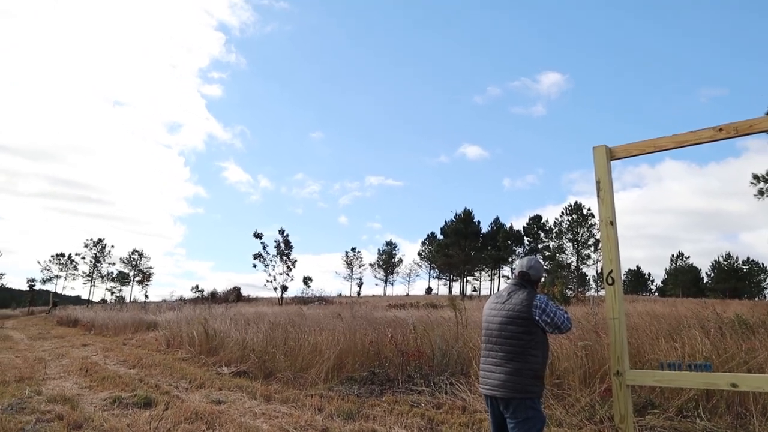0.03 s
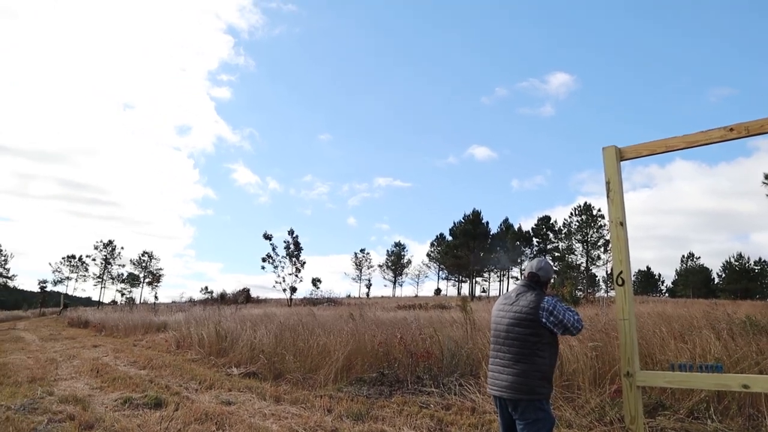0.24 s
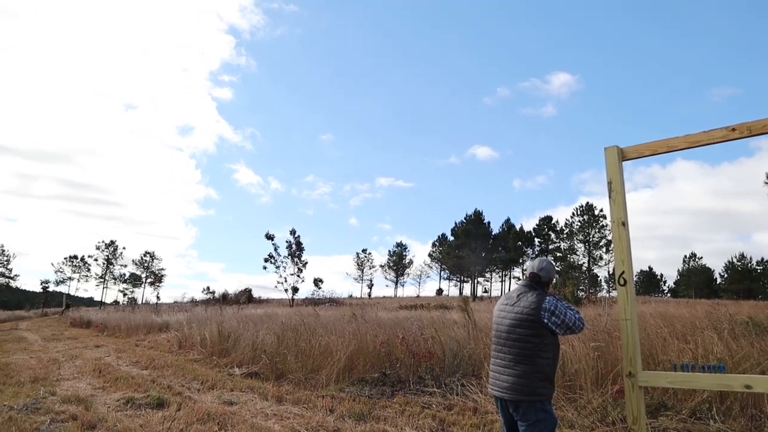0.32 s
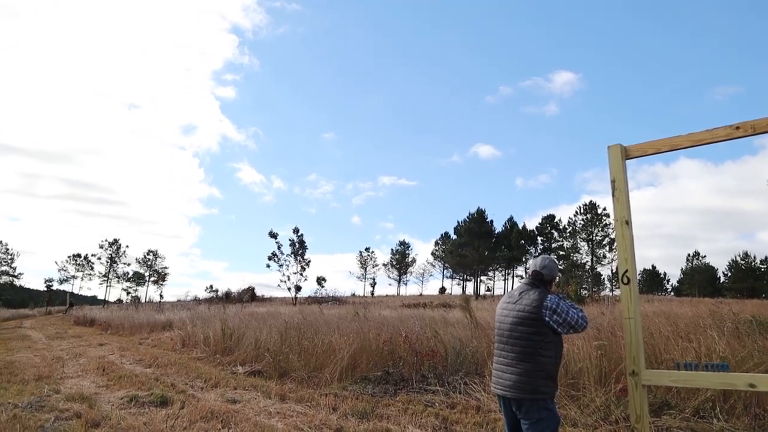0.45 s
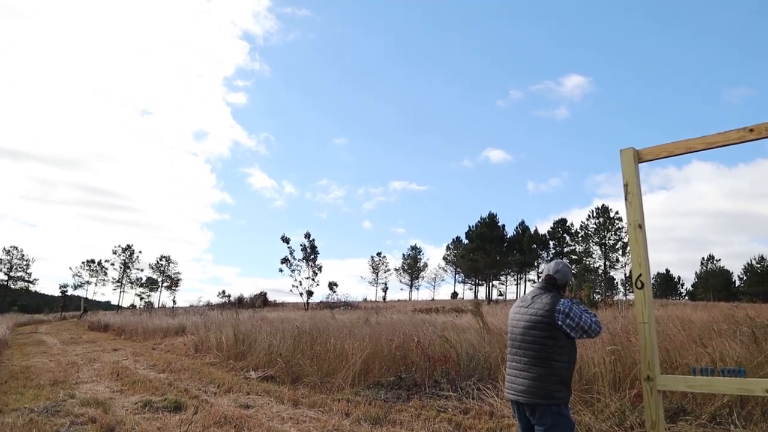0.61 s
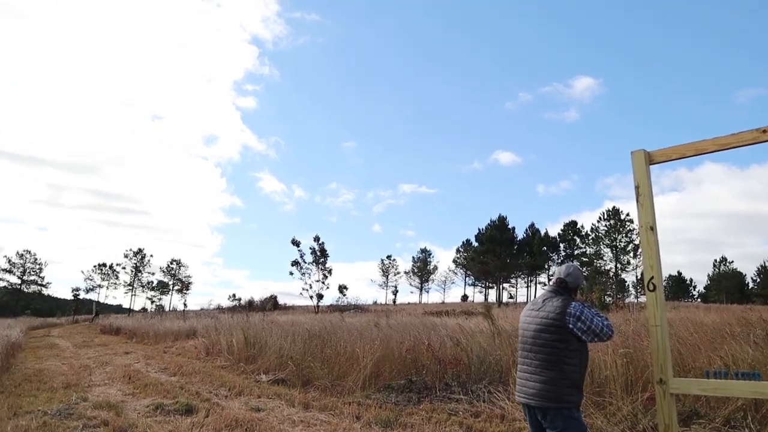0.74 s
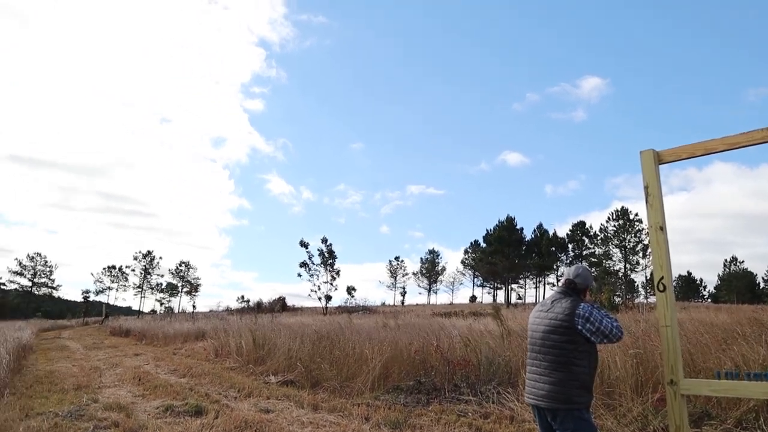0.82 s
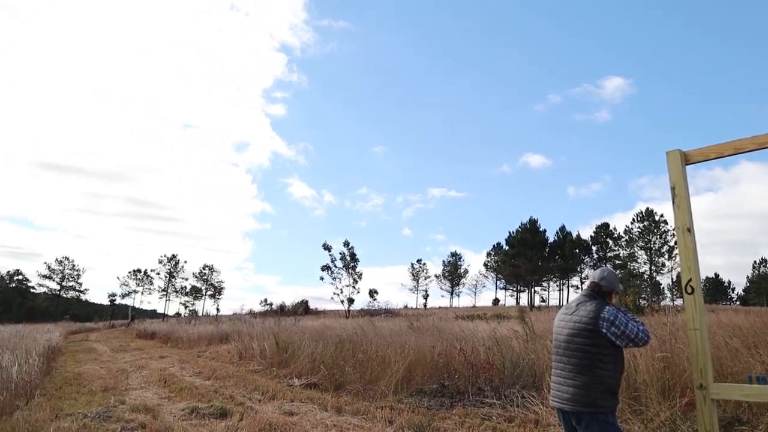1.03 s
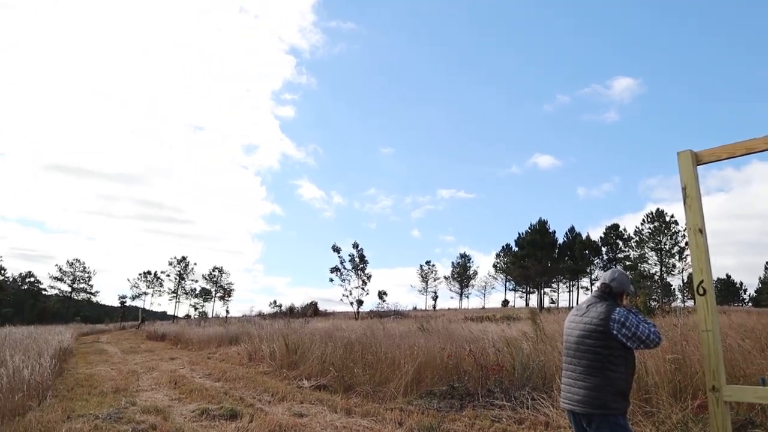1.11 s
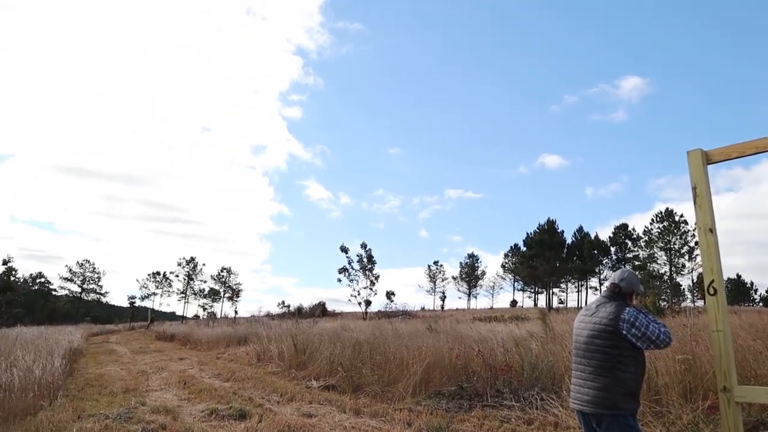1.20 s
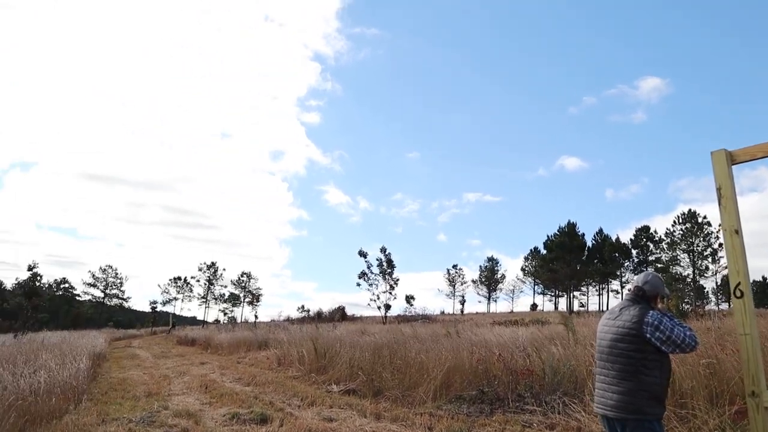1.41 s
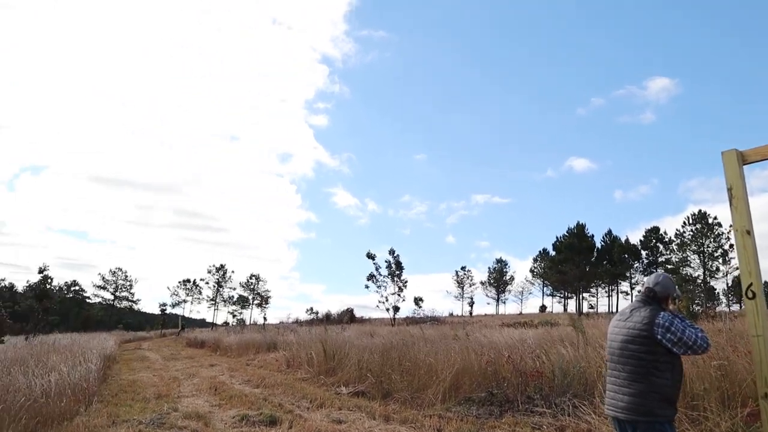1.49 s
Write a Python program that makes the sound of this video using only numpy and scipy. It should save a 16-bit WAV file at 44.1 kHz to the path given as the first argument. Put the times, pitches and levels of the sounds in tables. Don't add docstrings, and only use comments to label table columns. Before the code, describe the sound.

Double shotgun shot outdoors, a duller one then a close overloaded crack, with scattered fading echoes

```python
import sys
import numpy as np
from scipy import signal
from scipy.fft import rfft, irfft
from scipy.io import wavfile

SR = 44100
rng = np.random.default_rng(int(sys.argv[2]) if len(sys.argv) > 2 else 0)


def store_wav(level_fs):
    pcm = np.round(np.clip(np.atleast_2d(level_fs), -1, 1) * 32767)
    wavfile.write(sys.argv[1], SR, pcm.T.astype(np.int16))


def invert_db(x):
    u = np.asarray(x, float) / 20
    return 10 ** u


N = 68355
T = np.arange(N) / SR


def at_hz(points, hz):
    curve_hz, curve_db = np.transpose(points)
    return np.interp(np.log(hz), np.log(curve_hz), curve_db)


def rms_one(x):
    return x / np.sqrt(np.mean(x ** 2) + 1e-20)


def drift(rate_hz):
    r = np.exp(-2 * np.pi * rate_hz / SR)
    smooth = signal.lfilter([1], [1, -2 * r, r * r], rng.standard_normal(2 * N))
    return rms_one(smooth[N:])


def band_pass(x, order, low_hz, high_hz):
    return signal.sosfilt(signal.butter(order, [low_hz, high_hz], "band", fs=SR, output="sos"), x)


CENTRES = 30 * 2 ** np.arange(0, 9.6, .5)


def split(x, spectrum):
    hz = np.maximum(np.fft.rfftfreq(N, 1 / SR), 1)
    coloured = irfft(rfft(x) * invert_db(at_hz(spectrum, hz)), N)
    shaped = rfft(rms_one(coloured))
    for centre in CENTRES:
        overlap = np.clip(1 - 2 * np.abs(np.log2(hz / centre)), 0, 1)
        yield centre, irfft(shaped * overlap, N)


def grains():
    per_second, spread_db = 6100, 2
    sizes = invert_db(spread_db * np.minimum(rng.exponential(1, N), 5))
    signs = rng.choice([-1, 1], N)
    return rms_one(sizes * signs * (rng.random(N) < per_second / SR))


# pitch in Hz, level in dB per Hz.
TREE_TONE = [(250, -44), (450, -10.5), (900, -4), (2500, -8), (4300, -8.5), (4900, -12), (10000, -9.5),
             (15500, -22)]


def scatter(fired_s, echoes, wash_db, wash_t60_s, spectrum=TREE_TONE):
    patchy_db = 2
    skirt_db, skirt_stretch = -5.5, 1.2
    air_db_per_s, air_power = 2.5, 1.43
    age = T - fired_s
    flown = np.maximum(age, 0)
    clumps = []
    for s, db, spread_s, tilt in echoes:
        u = (T - s) / spread_s
        shape = np.exp(-u * u) + invert_db(2 * skirt_db) * np.exp(-(u / skirt_stretch) ** 2)
        clumps.append((invert_db(2 * db) * shape, tilt))
    wash_level_db = wash_db - 60 * age / wash_t60_s + patchy_db * drift(24)
    clumps.append((invert_db(2 * wash_level_db), 0))
    out = np.zeros(N)
    for hz, band in split(grains(), spectrum):
        power = sum(clump * invert_db(2 * tilt * np.log2(hz / 1500)) for clump, tilt in clumps)
        power = power * (age > 0)
        air_loss_db = air_db_per_s * (hz / 1000) ** air_power * flown
        out += band * np.sqrt(power) * invert_db(patchy_db * .7 * drift(40) - air_loss_db)
    return out


# pitch in Hz, level in dB per Hz.
WIND_TONE = [(12, -34), (20, -9), (302, -13), (656, -3.5), (753, -8), (1170, -5), (2770, -16.5),
             (5380, -28), (15000, -32)]


def wind():
    hiss_db, rumble_db, rumble_hz = -57, -60, 70
    hiss = sum(band * invert_db(1.5 * drift(14)) for _, band in split(rng.standard_normal(N), WIND_TONE))
    low_pass = signal.butter(2, rumble_hz, fs=SR, output="sos")
    low = signal.sosfilt(low_pass, rng.standard_normal(N))
    return invert_db(hiss_db) * hiss + invert_db(rumble_db + 1.3 * drift(4)) * rms_one(low)


def old_wash():
    start_db, t60_s, age_s = -45.5, 0.67, 0.6
    return scatter(-age_s, [], start_db + 60 * age_s / t60_s, t60_s)


# time in seconds, level in dB.
BOOM_LEVEL = [(0.233, -34.5), (.275, -45.5), (.33, -44.5), (.385, -51), (0.424, -32), (.49, -26),
              (.56, -32.5), (.61, -37.5), (.7, -38), (.82, -45), (.87, -50), (.92, -49), (1.13, -52.5),
              (1.301, -62)]
# pitch in Hz, level in dB per Hz.
BOOM_TONE = [(70, -32), (120, -17), (180, -6), (260, -1), (400, 0), (600, -13)]


def boom():
    lumps_db, dulls_db_per_s = 2.5, 7.0
    s, db = np.transpose(BOOM_LEVEL)
    level = np.interp(T, s, db)
    level -= 2000 * np.maximum(s[0] - T, 0)
    level -= 60 * np.maximum(T - s[-1], 0)
    tone = [(20, -73.5)] + list(BOOM_TONE) + [(900, -54.5)]
    out = np.zeros(N)
    for hz, band in split(rng.standard_normal(N), tone):
        if hz < 1000:
            dulling_db = dulls_db_per_s * np.log2(hz / 200) * T
            out += band * invert_db(level + lumps_db * drift(20) - dulling_db)
    return out


# time in seconds, peak level in dB, pitch in Hz.
TRUNKS = [(0.338, -27, 890), (0.895, -32, 890), (1.005, -34.5, 1020), (1.039, -38, 686), (1.092, -35, 1050),
          (1.154, -34.5, 720), (1.179, -41, 817), (1.222, -35.5, 715), (1.232, -34, 802),
          (1.257, -33.5, 690), (1.283, -36.5, 790), (1.31, -38, 589), (1.353, -37, 648),
          (1.374, -40.5, 723), (1.41, -38, 1212), (1.432, -41.5, 610), (1.462, -40.5, 1298),
          (1.475, -43.5, 630), (1.514, -43, 562)]


def trunks():
    length_cycles, level_db = .6, -5.5
    out = np.zeros(N)
    for s, db, hz in TRUNKS:
        cycles = (T - s) * hz - 2
        out += invert_db(db + level_db) * np.cos(2 * np.pi * cycles) * np.exp(-.5 * (cycles / length_cycles) ** 2)
    return out


# time in seconds, level in dB, width in
# milliseconds.
THUDS = [(.21305, -10, .28), (.264, -32, .9), (.277, -31, 1.0), (.575, -20, .5), (.623, -32, .9),
         (.6975, -22, .12), (.749, -22, .08), (.0633, -43, .1), (.150, -48, .1)]


def thuds():
    out = np.zeros(N)
    for s, db, ms in THUDS:
        u = (T - s) / ms * 1000
        out += invert_db(db) * (1 - .5 * u - u * u) * np.exp(-.5 * u * u)
    return out


# time in seconds, level in dB, spread in seconds,
# brightness in dB per octave.
FAR_ECHOES = [(.278, -52, 0.002, -1), (.300, -36.5, 0.0043, 0), (.313, -36.5, 0.0049, 0.5),
              (.342, -38, 0.004, 1), (.357, -37.5, .007, -0.5), (.392, -61, 0.0085, 1)]
# pitch in Hz, level in dB per Hz.
FAR_TONE = [(250, -31.5), (450, -8.5), (900, -4), (2500, -8), (4300, -7.5), (4900, -14.5), (9000, -21),
            (15500, -32)]


def far_echoes():
    return scatter(FRONTS[0][0], FAR_ECHOES, wash_db=-35.5, wash_t60_s=0.84, spectrum=FAR_TONE)


# time in seconds, level in dB, spread in seconds,
# brightness in dB per octave.
NEAR_ECHOES = [(0.423, -31, 0.018, 0.5), (0.468, -29.5, .012, 1.5), (0.497, -23.5, 0.013, -1),
               (0.52, -26, 0.0088, -1), (0.551, -26, .008, -1), (.590, -29.5, 0.0086, 0),
               (.620, -58, .01, 7), (.661, -26.5, 0.0047, 0), (.698, -26.5, 0.0045, -2.5),
               (0.749, -26, 0.0051, -2), (0.776, -35, .004, -0.5), (0.788, -31, 0.0031, -2),
               (.804, -32, 0.0069, -0.5), (0.907, -35.5, 0.015, -0.5), (.970, -32.5, 0.0057, 1.5),
               (1.004, -40, 0.016, 1), (1.038, -36, 0.0046, -1), (1.087, -44.5, 0.03, 0),
               (1.174, -43, .012, -0.5), (1.24, -44, .02, 1), (.686, -49.5, 0.0028, 6),
               (0.74, -45, 0.009, 5.5), (0.817, -40, 0.0066, 1), (1.47, -54, .01, 0)]


def near_echoes():
    return scatter(FRONTS[1][0], NEAR_ECHOES, wash_db=-38, wash_t60_s=5.24)


# start in seconds, level in dB, attack in seconds,
# time to fall 60 dB in seconds, centre pitch in Hz.
CRACKLE = [
    (.2119, -16, .0003, .045, 2200),
    (.2240, -22, .0003, .015, 2900),
    (.2288, -27, .0004, .08, 3000),
]
NEAR_CRACKLE = [
    (.4077, -10, .0002, .017, 2300),
    (.4005, -26, .002, .2, 2000),
]
CRACKLE_AIR_DB = [-9, -14, -13, -4, -10]


def crackle():
    width, air_hz = 1.45, 7000
    out = np.zeros(N)
    for (s, db, attack_s, t60_s, hz), air_db in zip(list(CRACKLE) + list(NEAR_CRACKLE), CRACKLE_AIR_DB):
        noise, after = rng.standard_normal(N), np.maximum(T - s, 0)
        body = rms_one(band_pass(noise, 2, hz / width, hz * width))
        air = rms_one(band_pass(noise, 1, air_hz / 2, air_hz * 1.2))
        envelope = invert_db(db - 60 * after / t60_s) * (1 - np.exp(-after / attack_s))
        out += envelope * (body + invert_db(air_db) * air)
    return out


def pellets():
    start_s, last_s, level_db, pitch_hz, jitter = .40635, .0011, 10, 2450, .4
    u = (T - start_s) / last_s
    phase = 2 * np.pi * np.cumsum(pitch_hz * (1 + jitter * drift(1500))) / SR
    fade_in = np.clip(4 * u, 0, 1)
    fade_out = np.clip(1 - 3 * (u - 1), 0, 1)
    return invert_db(level_db) * fade_in * fade_out * np.sin(phase)


# time in seconds, front level in dB, front width in milliseconds,
# rebound level in dB, rebound pitch in Hz.
FRONTS = [
    (.21185, -1.6, .075, -7.5, 185),
    (.40573, 9, .035, -11, 110),
    (.40965, 5, .075, -5.5, 190),
]
REBOUND_DB_PER_CYCLE = [14, 45, 75]
RISE_STRETCH = [3.4, 1.0, 1.0]


def fronts():
    out = np.zeros(N)
    for (s, db, ms, back_db, hz), loss_db, stretch in zip(FRONTS, REBOUND_DB_PER_CYCLE, RISE_STRETCH):
        after = np.maximum(T - s - ms / 1000, 0)
        peak = np.max(np.sin(2 * np.pi * hz * T) * invert_db(-loss_db * T * hz))
        swing = np.sin(2 * np.pi * hz * after) / peak
        out += invert_db(back_db - loss_db * after * hz) * swing
        width_ms = ms * np.where(T < s, stretch, 1)
        out -= invert_db(db) * np.exp(-.5 * ((T - s) / width_ms * 1000) ** 2)
    return out


def scene():
    field = wind() + old_wash()
    answers = boom() + trunks() + thuds() + far_echoes() + near_echoes()
    shots = crackle() + pellets() + fronts()
    return (field + answers + shots)[None]


def top_cut(x):
    return signal.sosfilt(signal.butter(12, 16810, fs=SR, output="sos"), x)


def record(dry):
    ceiling = np.where(T < FRONTS[1][0] - .1, 1.3, .63)
    x = dry / (1 + np.abs(dry / ceiling) ** 6) ** (1 / 6)
    x = signal.sosfilt(signal.butter(1, 20, "high", fs=SR, output="sos"), x)
    x = signal.sosfilt(signal.cheby1(8, .5, 15800, fs=SR, output="sos"), x)
    return top_cut(x)


dry = scene()
out = record(dry)
store_wav(out)
```